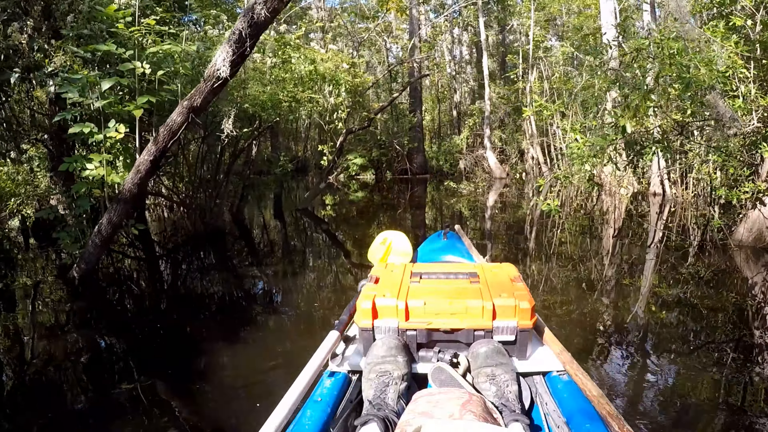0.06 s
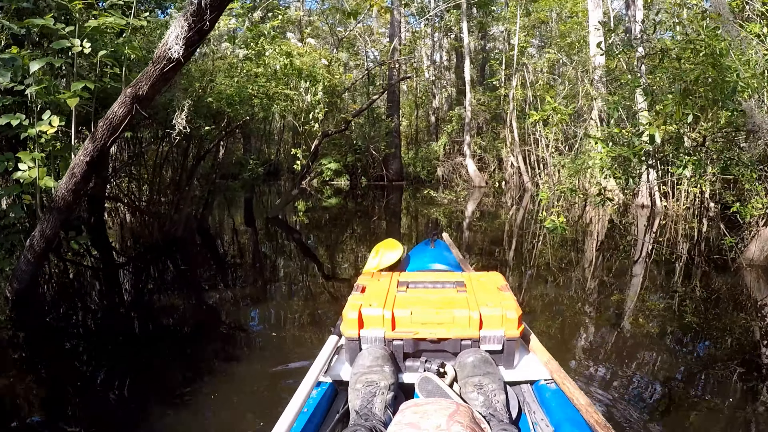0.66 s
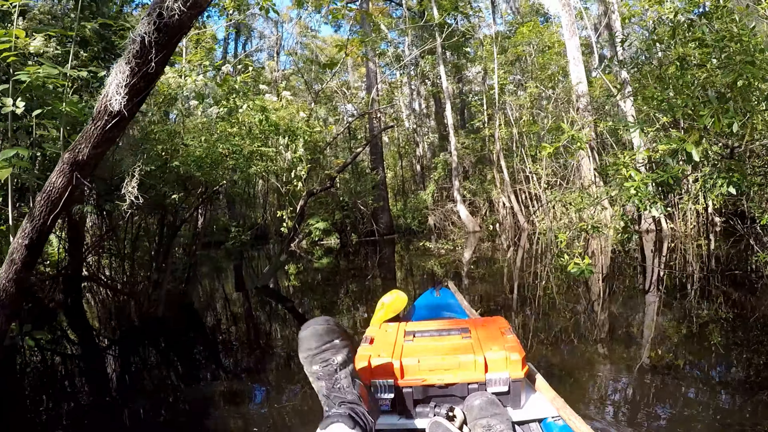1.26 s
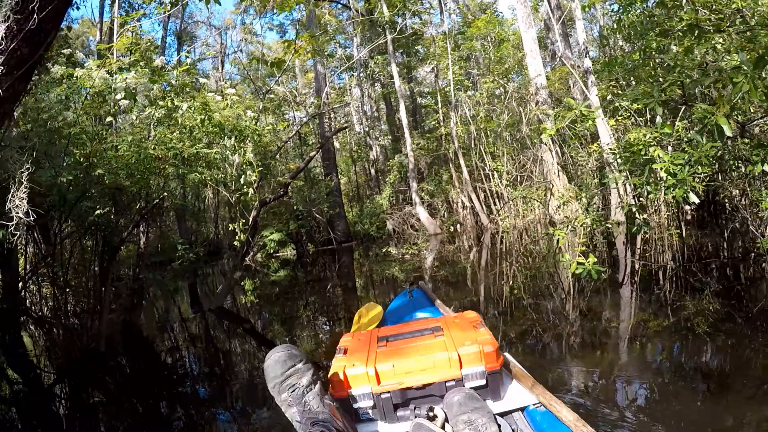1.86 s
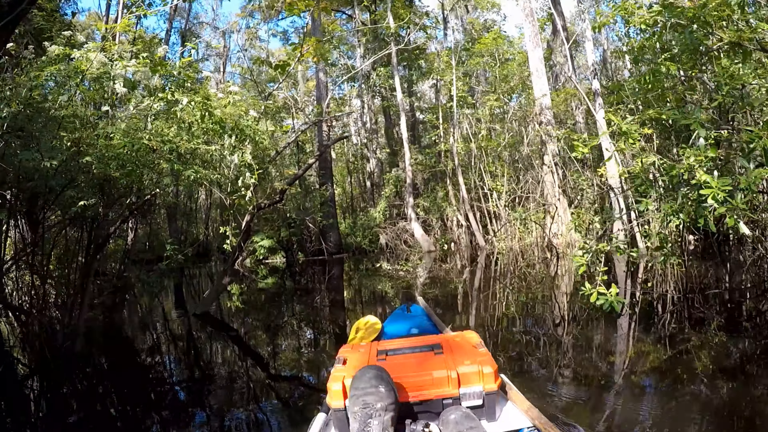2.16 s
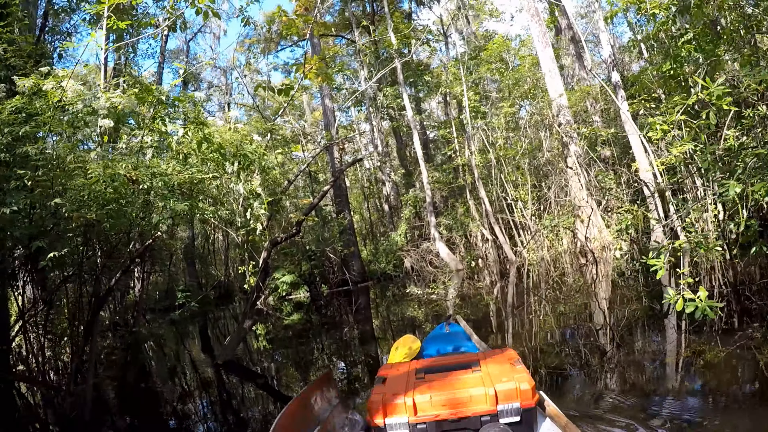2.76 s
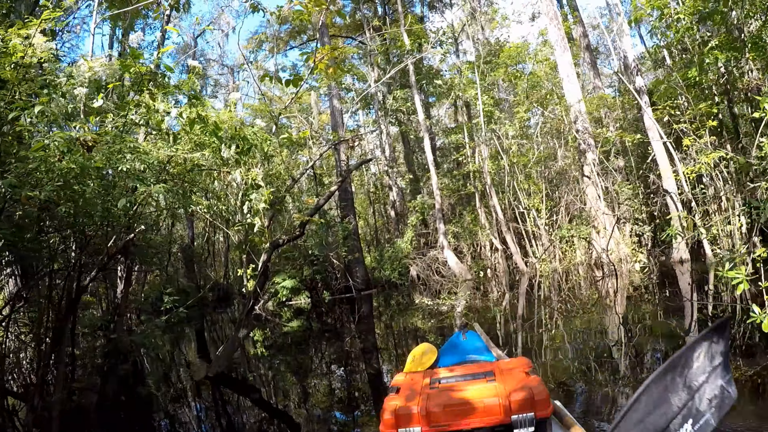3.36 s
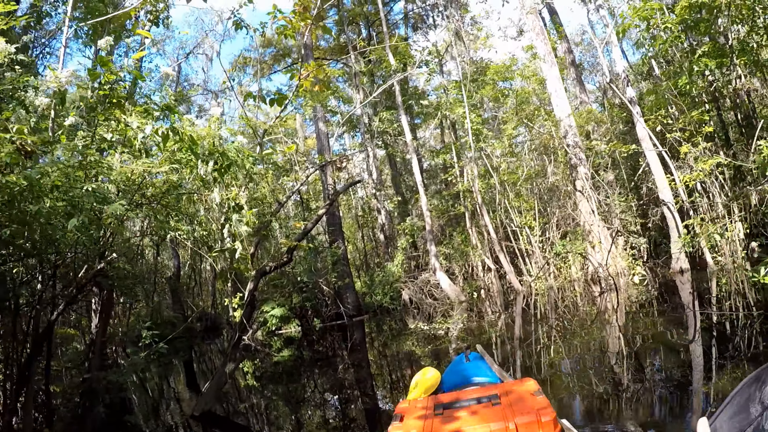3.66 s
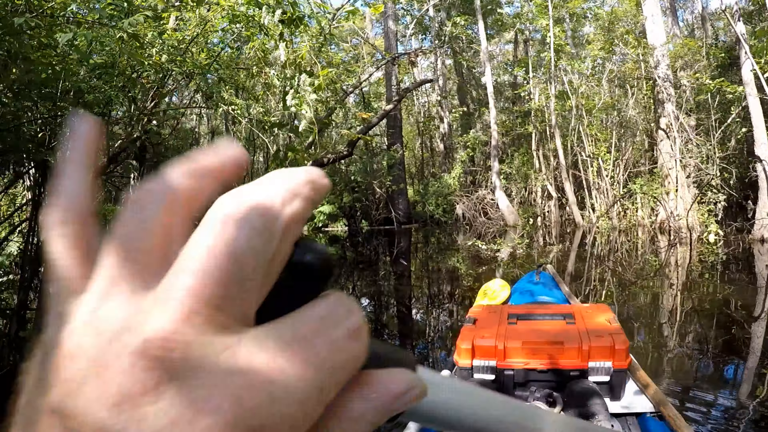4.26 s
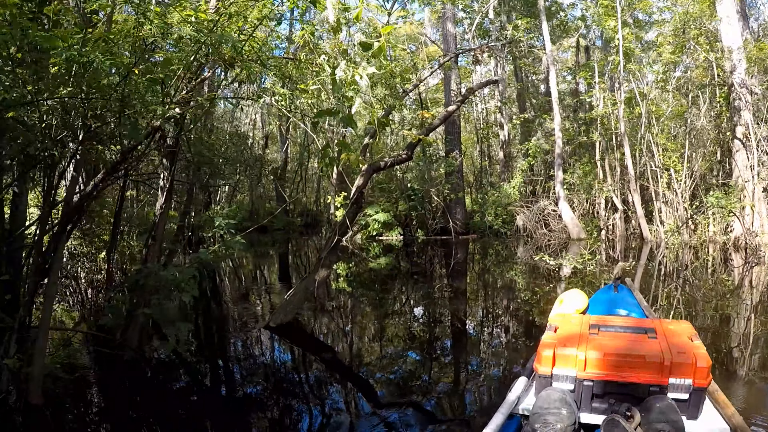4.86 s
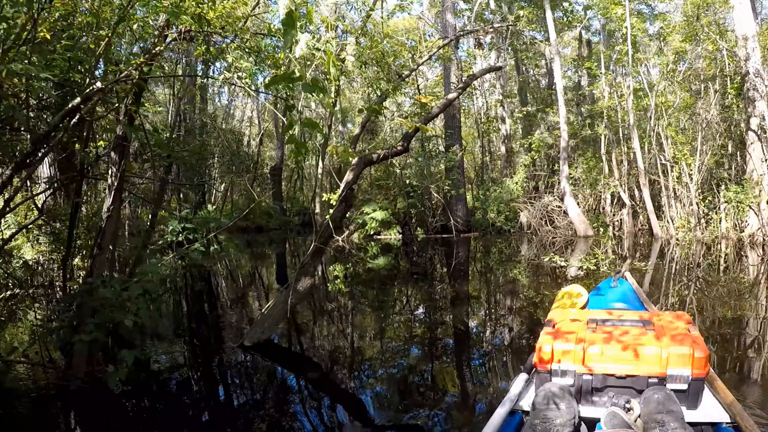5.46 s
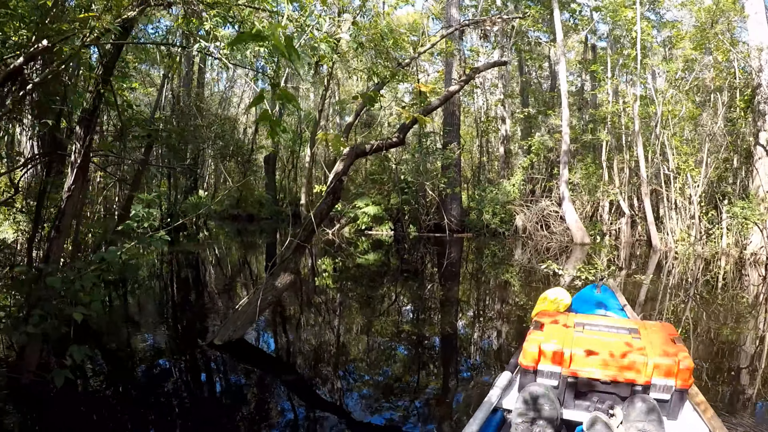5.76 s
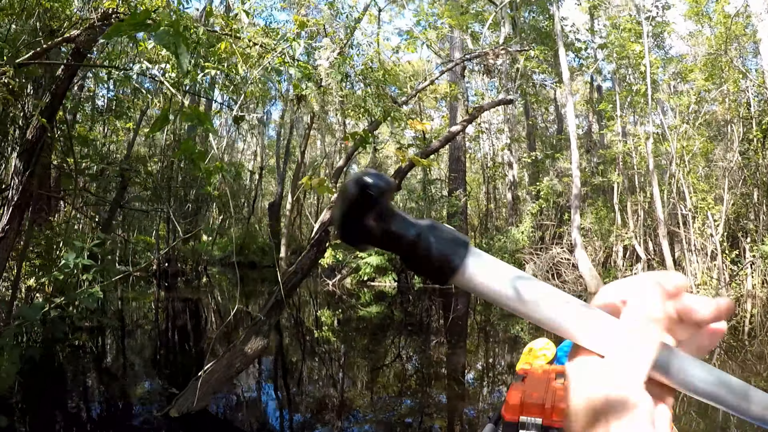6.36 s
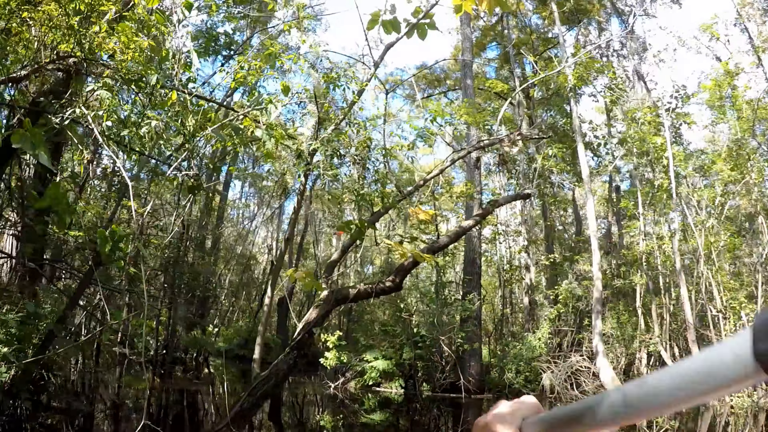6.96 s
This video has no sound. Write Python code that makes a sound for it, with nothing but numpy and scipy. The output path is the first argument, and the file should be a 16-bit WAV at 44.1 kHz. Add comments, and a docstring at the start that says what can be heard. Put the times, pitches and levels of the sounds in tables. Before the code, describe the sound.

Heard in stereo from the seat of a small plastic boat on a still swamp, a soft low hum and faint, thin insects run throughout. From the start, boots and hard gear knock and scrape close by on the hollow hull, building to a loud clatter and a short rubbing groan at 0.7 seconds. Another loud cluster of knocks comes at 1.6 seconds, with brief rubber squeaks. A low shudder swells underneath as weight shifts, and lighter bumps and scrapes continue until about 3 seconds.

Sleeves brush softly from 3.4 to 4.1 seconds, while a distant bird gives two very faint, high chirps. From about 5.2 seconds a paddle pulls once gently through the water on the right, with gurgling bubbles and drips, and a small flick of spray near 6.3 seconds. At about 6.7 seconds the shaft raps sharply on the boat's edge, ringing briefly through the hull.

```python
"""Boots and gear knock, scrape and squeak on the hollow hull of a small plastic boat, close to the
stereo microphone at the seat, and the boat shudders as the paddler's weight shifts. Sleeves brush; on
the right the blade pulls once through the water, stirring ringing bubbles, and drips. Last, the paddle
shaft raps the gunwale. Farther out on the still swamp: a low hum, a thin band of insects, a far bird."""
import sys
import numpy as np
from scipy import signal
from scipy.fft import rfft, irfft, next_fast_len
from scipy.io import wavfile
from scipy.ndimage import uniform_filter1d

SR = 44100
rng = np.random.default_rng(int(sys.argv[2]) if len(sys.argv) > 2 else 0)


def master_out(mix):
    """Clip the mix to full scale and print it as 16-bit PCM to the path in sys.argv[1]."""
    frames = np.transpose(np.atleast_2d(mix))
    ceiling = np.clip(frames, -1, 1)
    pcm = np.round(ceiling * 32767).astype(np.int16)
    wavfile.write(sys.argv[1], SR, pcm)


N = 309141
T = np.arange(N) / SR

# open air over the swamp: f/Hz, density/dB
AIR_SPECTRUM = [(90, -59), (125, -4), (205, -3.5), (235, -8), (300, -10), (420, -17.5), (650, -21.5),
                (1050, -24), (2200, -28.5), (3000, -30.5), (5500, -33.5), (7900, -29), (12000, -37),
                (14800, -50.5)]
# its stereo width: f/Hz, side against mid/dB
AIR_WIDTH = [(60, -10), (110, -8), (200, -3.5), (370, 3.5), (690, 10.5), (1260, 8.5), (2320, 2.5),
             (4270, -4), (7860, 3), (14500, -2.5)]
# a bird far off in the trees: t/s, length/s, f/Hz, level/dB
BIRD_CHIRPS = [(3.725, .06, 4900, -60), (4.02, 0.058, 4870, -62)]
# sleeves brushing as the paddle changes sides: t/s, rise/s, fall/s, level/dB
SLEEVE_BRUSHES = [(3.39, .03, 0.052, -56.5), (3.575, 0.17, 0.15, -52.5), (3.75, 0.14, 0.19, -59),
                  (3.935, 0.027, 0.045, -52.5), (4.05, .08, .08, -57), (6.3, 0.13, 0.35, -53)]
# brushing cloth: f/Hz, density/dB
CLOTH_SPECTRUM = [(900, -22), (1600, -3), (2200, 7.5), (2900, -4), (3800, 2), (5000, 0.5), (7800, 7.5),
                  (9500, -5), (13000, -19)]
# shifts of weight that rock the boat: t/s, rise/s, fall/s, level/dB
WEIGHT_SHIFTS = [(.68, 0.077, 1.4, -45), (1.08, 0.14, 0.53, -39.5), (1.7, 0.37, 0.9, -37.5),
                 (2.3, 0.24, .5, -47.5), (2.7, 0.46, 1.05, -48), (3.52, 0.14, 0.34, -55.5),
                 (3.98, 0.36, 0.56, -63)]
# shudder through the microphone mount: f/Hz, density/dB
RUMBLE_SPECTRUM = [(11, -20), (18, -3.5), (48, 1), (87, -8), (130, -1.5), (170, 10.5), (290, -120)]
# water churned by the blade: f/Hz, density/dB
CHURN_SPECTRUM = [(250, -6), (450, -10), (1000, -6.5), (1900, -1.5), (2500, -15), (3400, -9), (5000, -14.5),
                  (9000, -12)]
# spray flicked off the lifted blade: t/s, level/dB
SPRAY_FLICKS = [(6.085, -55), (6.175, -59), (6.265, -44)]
# single drops and bubbles beside the boat: t/s, f/Hz, level/dB, t60/s
WATER_DROPS = [(5.134, 3600, -49, .02), (5.212, 697, -40.5, 0.13), (5.290, 1360, -38, 0.015),
               (5.291, 1900, -32.5, 0.014), (5.327, 703, -41.5, 0.078), (5.338, 3500, -44.5, 0.017),
               (5.383, 1790, -34.5, 0.028), (5.402, 4100, -37, 0.011), (5.437, 3370, -44, 0.028),
               (5.467, 3300, -38, .014), (5.4956, 7840, -42, .01), (5.515, 1880, -23, 0.023),
               (5.522, 2730, -37, .012), (5.537, 760, -42, 0.033), (5.665, 1340, -37, .02),
               (5.680, 8700, -26.5, 0.006), (5.708, 990, -33, 0.022), (5.703, 8160, -28, 0.0049),
               (5.728, 8700, -31.5, 0.007), (5.831, 4400, -42.5, .012), (6.187, 8610, -33, 0.009),
               (6.229, 8920, -33, 0.0072), (6.2652, 8000, -18.5, 0.0027)]
# boots dragging on the hull; at 0.70 s a loud groan is cut off by a sudden drop in level:
# peak t/s, rise/s, fall/s, groan level/dB, rasp against groan/dB, hiss against groan/dB
BOOT_DRAGS = [(.24, 0.065, 0.57, -40.5, -6, -17.5), (0.668, 0.062, 0.095, -32, -4, -15),
              (0.698, 0.022, 0.0052, -18.5, -14, -30), (.79, 0.16, 0.28, -34.5, -5, -20.5),
              (1.05, 0.073, 0.41, -38, -5.5, -26), (1.567, 0.019, 0.046, -26.5, 0.5, -10),
              (1.589, 0.026, 0.12, -22, -5.5, -15), (1.681, 0.012, 0.046, -38, -8, -6.5),
              (1.75, 0.071, 0.55, -43.5, -15, -32), (2.253, 0.027, 0.089, -39, -7, -16),
              (2.37, 0.1, 0.25, -35, -10.5, -23.5), (2.392, 0.03, 0.033, -42, 3, -1.5),
              (2.63, 0.046, 0.65, -46.5, -7.5, -23)]
# a sole rubbing on plastic: f/Hz, density/dB
SOLE_SPECTRUM = [(130, 4), (260, 0), (450, -4.5), (700, -12.5), (880, -12), (1080, -8.5), (1600, -22),
                 (1900, -16.5), (2700, -19.5), (3800, -24.5), (4900, -29.5), (6000, -28), (9000, -36.5),
                 (12000, -65)]
# rubber squeaks in the hardest drag: t/s, length/s, f/Hz, slide/share of the pitch, level/dB
SOLE_SQUEAKS = [(1.566, 0.047, 3610, 0, -37), (1.602, 0.035, 6400, -0.015, -42),
                (1.612, 0.028, 1330, 0.038, -33), (1.618, 0.034, 5600, 0.024, -39),
                (1.596, 0.06, 3880, 0.126, -37.5), (1.667, 0.022, 6180, -0.123, -46),
                (1.69, 0.017, 3170, .12, -48)]
# loose hard gear, jolted: t/s, level/dB, left minus right/dB, crack against ring/dB
GEAR_JOLTS = [(.2098, -31.5, -2, -14), (.232, -42, -1, -17), (.277, -32, -5, -19), (.309, -37, -1, -20),
              (.424, -40, 0, -14), (.528, -37.5, 0, -21), (0.6558, -22.5, 0, -10), (.669, -31.5, -2, -7),
              (.686, -29.5, -4, -12), (.994, -41, -3, -14), (2.3897, -38, -5, 3.5), (2.3945, -43, 4, 4),
              (2.473, -47.5, -7, -8)]
# modes of that gear: f/Hz, level/dB, t60/s
GEAR_MODES = [(1677, -4, 0.052), (2108, 1, 0.032), (2310, 5.5, 0.016), (2560, -17.5, 0.021),
              (3260, -7, 0.038), (3660, -2, 0.016)]
# dense short ring of the boat's shell: f/Hz, density/dB
SHELL_SPECTRUM = [(120, 11.5), (250, 1), (600, 5.5), (1100, 0.5), (2000, -11.5), (2700, -13.5), (3600, -11),
                  (5000, -20.5), (8000, -13), (11000, -16), (15000, -98)]
# the shaft chatters on the gunwale: t/s, level/dB, contact cut-off f/Hz, left minus right/dB
SHAFT_RAPS = [(6.6534, -26.5, 3500, 2), (6.655, -24.5, 2600, -15), (6.6658, -18.5, 1090, 1.5),
              (6.676, -30.5, 800, -6), (6.684, -32, 1400, -6)]
# modes of shaft and gunwale: f/Hz, level/dB, t60/s
SHAFT_MODES = [(163.3, -11.5, 0.29), (195, -13, 0.12), (269, -8.5, 0.14), (323, -21, 0.065),
               (474, -19, 0.16), (580, -8.5, 0.09), (742, -0.5, 0.071), (845, -8, 0.051), (868, -8, 0.072),
               (1130, 5.5, 0.027), (1232, 1, 0.057), (1260, -1, 0.028), (1700, 4.5, 0.03), (1840, 4, 0.032),
               (2020, 3.5, 0.028), (2180, -28, 0.025), (2380, -35, .05), (3140, -29, 0.064),
               (3530, -3.5, 0.02), (3770, -30, 0.02)]
# boots and gear landing on the hull: t/s, level/dB, contact cut-off f/Hz, left minus right/dB,
# contact damping t60/s, thud f/Hz, clack f/Hz, tick f/Hz
HULL_BLOWS = [(0.03, -48.5, 1100, 17, 0.7, 447, 990, 3380), (0.15, -40.5, 1400, 1, 0.47, 400, 1020, 3800),
              (0.2099, -34.5, 5500, -1.5, 0.41, 440, 1520, 3600),
              (.231, -35, 2720, 0, 0.55, 410, 1110, 3280), (0.243, -44.5, 2600, 2, 0.49, 348, 1190, 3350),
              (.276, -30, 2020, 3.5, 0.49, 415, 1003, 3450), (0.308, -45, 3900, -7, 0.79, 427, 1720, 3200),
              (.424, -38.5, 1270, -2, 0.43, 315, 2040, 3600),
              (0.527, -39.5, 3420, -4.5, 0.4, 396, 1210, 3750),
              (0.639, -32, 1400, 3, 0.19, 437, 1150, 3300), (.655, -17, 2000, -2, 0.19, 390, 1366, 3500),
              (0.668, -17, 700, 6, 0.054, 383, 1410, 3680), (0.685, -22, 1140, 2, 0.053, 417, 1385, 4800),
              (.711, -32.5, 400, -2, 0.042, 310, 1100, 3500),
              (0.811, -32.5, 400, -3, 0.56, 354, 1090, 3500),
              (0.841, -32.5, 1610, 7, 0.33, 435, 1300, 3870), (0.948, -41, 2700, -4, 0.56, 437, 1430, 3720),
              (0.984, -41, 2480, -1, .5, 445, 1890, 3740), (.994, -33.5, 1250, 4, 0.45, 475, 1200, 3540),
              (1.061, -25, 810, 3, 0.3, 417, 1075, 3850), (1.225, -42.5, 800, -1, 0.33, 450, 900, 5900),
              (1.26, -46.5, 7100, -1, 0.12, 434, 1110, 3980), (1.3398, -36, 326, 1, 0.041, 470, 755, 3500),
              (1.557, -26.5, 1200, -5, 0.36, 437, 1310, 3480),
              (1.567, -24.5, 1900, 10, 0.34, 435, 1190, 4220),
              (1.584, -18.5, 1320, -3, 0.17, 367, 1470, 3700),
              (1.591, -20, 400, -4, 0.068, 384, 1100, 3700), (1.652, -32, 1010, -1, 0.57, 403, 1070, 3500),
              (2.3895, -31, 1050, -1, 0.08, 530, 1390, 3160), (2.401, -39, 820, -10, 0.09, 475, 1120, 3480),
              (2.452, -42, 500, -11, .08, 490, 1000, 3500), (2.51, -41.5, 950, -3, 0.66, 385, 1170, 5900),
              (2.603, -49, 1700, -5, 0.065, 437, 1800, 3500), (2.839, -30, 390, -5, 0.12, 520, 740, 3500),
              (2.847, -40.5, 228, 1, 0.31, 494, 800, 3500), (3.059, -43, 190, -3, 0.15, 305, 800, 3500)]
# modes of the hull: f/Hz, level/dB, t60/s
HULL_MODES = [(161, -1.5, 0.7), (194.5, -5.5, 1), (227.8, -3, 0.33), (271, 2, 0.14), (307.6, 0.5, 0.14),
              (402, -4, 0.059), (486, -6.5, 0.18), (585, -6.5, 0.12), (677, -3.5, 0.093), (770, -3, 0.056),
              (1090, -9.5, 0.047), (1200, -7, 0.018), (1376, -16, 0.021), (1510, -19, 0.024),
              (1804, -7, 0.026), (1917, -6.5, 0.048), (2070, -13, 0.031)]

MIC_LAG_S = 0.00025  # sound from the right reaches the left microphone this late
# one stroke: the blade slides in, pulls and leaves, then water runs off it
STROKE_S, STROKE_RISE_S, STROKE_HOLD_S, STROKE_FALL_S, RUNOFF_S = 5.52, 0.3, 0.31, 0.16, 0.55


def undb(db):
    """Decibels to gain."""
    return 10 ** (np.asarray(db) / 20)


def unit(x):
    """Scale to rms 1."""
    return x / np.sqrt(np.mean(x ** 2) + 1e-20)


def unit_head(x, seconds):
    """Scale so that the first moments have rms 1."""
    return x / np.sqrt(np.mean(x[:, :int(seconds * SR)] ** 2))


def noise(size=N):
    """Two unrelated channels of white noise."""
    return rng.standard_normal((2, size))


def band(x, lo_hz, hi_hz, order=3):
    """Butterworth band-pass."""
    sos = signal.butter(order, [lo_hz, min(hi_hz, SR / 2 - 1)], "band", fs=SR, output="sos")
    return signal.sosfilt(sos, x)


def colour(x, points):
    """Filter by (f/Hz, level/dB) points joined on a log axis."""
    hz, db = np.transpose(points)
    size = next_fast_len(x.shape[-1])
    f = np.fft.rfftfreq(size, 1 / SR) + 1
    gain = undb(np.interp(np.log(f), np.log(hz), db))
    return irfft(rfft(x, size) * gain, size)[..., :x.shape[-1]]


def walk(rate_hz):
    """Smooth random wander of rms 1."""
    hold = int(SR / rate_hz)
    steps = np.repeat(rng.standard_normal(N // hold + 1), hold)
    return unit(uniform_filter1d(uniform_filter1d(steps, hold), hold)[:N])


def fade(t, t60):
    """Exponential decay, 60 dB in t60."""
    return np.exp(-np.log(1000) * t / t60)


def swell(s, rise, fall, hold=0):
    """Attack, hold, release: full from s on; rise and fall are the times to a tenth."""
    return 10 ** -np.where(T < s, ((T - s) / rise) ** 2, np.maximum(T - s - hold, 0) / fall)


def swells(rows):
    """Joint gain of overlapping swells (t/s, rise/s, fall/s, level/dB)."""
    return np.sqrt(sum((undb(db) * swell(s, rise, fall)) ** 2 for s, rise, fall, db in rows))


def add(out, s, x):
    """Mix x into out at time s."""
    i = max(int(s * SR), 0)
    out[..., i:i + x.shape[-1]] += x[..., :max(out.shape[-1] - i, 0)]


def pan(x, db):
    """Left louder by db."""
    return x * undb(np.array([[db], [-db]]) / 2)


def spread(mid, side):
    """Panels all around the seat: bass alike at both microphones, treble wide."""
    side = colour(side, [(250, -26), (550, -11.5), (1000, 1.5), (3000, -5.5)])
    return np.array([mid + side, mid - side])


def from_right(x):
    """The left microphone hears it a moment late."""
    t = np.arange(len(x)) / SR
    return np.array([np.interp(t - MIC_LAG_S, t, x, left=0), x])


def ring(modes, t, detune, scatter_db):
    """Decaying modes; each blow lands elsewhere and scatters their tuning, weights and signs."""
    hz, db, t60 = np.transpose(modes)[:, :, None]
    shift, weight, polarity = rng.standard_normal((3, len(modes), 1))
    gain = np.sign(polarity) * undb(db + scatter_db * weight)
    return (gain * fade(t, t60) * np.sin(2 * np.pi * hz * (1 + detune * shift) * t)).sum(0)


def note(hz, t, t60):
    """One damped resonance, reaching each microphone with its own phase."""
    onset = 1 - np.exp(-t * hz)
    return np.sqrt(2) * onset * fade(t, t60) * np.sin(2 * np.pi * (hz * t + rng.random((2, 1))))


def swamp_air():
    """Soft air with a low hum, all around the boat."""
    mid, side = colour(noise(), AIR_SPECTRUM)
    side = colour(side, AIR_WIDTH)
    return np.array([mid + side, mid - side]) / np.std(mid) * undb(-50 + 0.07 * walk(3.76))


def wing_buzz(hz, width_hz):
    """Wings buzz in one narrow band, flickering slightly."""
    flicker = undb(walk(40))
    return unit(band(noise(), hz - width_hz / 2, hz + width_hz / 2, order=2)) * flicker


def insects():
    """A steady chorus far out on the swamp; one nearer insect trills briefly."""
    chorus = undb(-66) * wing_buzz(hz=7690, width_hz=480)
    trill = undb(-62.5) * wing_buzz(hz=6300, width_hz=390)
    return chorus + trill * swell(2.23, rise=0.19, fall=0.4, hold=0.35)


def bird():
    """Brief thin whistles from far off in the trees."""
    out = np.zeros((2, N))
    for s, length, hz, db in BIRD_CHIRPS:
        size = int(length * SR)
        phase = 2 * np.pi * np.cumsum(hz * (1 + 0.012 * walk(300)[:size])) / SR
        add(out, s, undb(db) * np.hanning(size) * np.sin(phase))
    return out


def sleeves():
    """Cloth brushes near the microphone in soft uneven strokes."""
    return unit(colour(noise(), CLOTH_SPECTRUM)) * undb(1.4 * walk(60)) * swells(SLEEVE_BRUSHES)


def rocking(rest_db=-71.5):
    """Each shift of weight sends a slow-dying shudder up the microphone mount; at rest it trembles."""
    mid, side = band(colour(noise(), RUMBLE_SPECTRUM), 16.5, 92)
    shudder = unit(np.array([mid + side / 4, mid - side / 4]))
    return shudder * np.hypot(swells(WEIGHT_SHIFTS), undb(rest_db))


def bubble(hz, t60, glide):
    """Trapped air rings and rises in pitch, heard directly and reflected off the boat's side."""
    t = T[:int(t60 * SR) + 2]
    phase = 2 * np.pi * hz * t * (1 + glide * t / t60 / 2)
    left_lag = 2 * np.pi * hz * MIC_LAG_S * np.array([[1], [0]])
    reflection = undb(-6.5) * np.sin(phase + 2 * np.pi * rng.random((2, 1)))
    onset = 1 - np.exp(-t * hz / 0.1)
    return onset * fade(t, t60) * (np.sin(phase - left_lag) + reflection)


def froth(lo_hz, hi_hz, cycles, scatter_db, count):
    """A cloud of bubbles, many faint and a few loud, over the span of the stroke."""
    out = np.zeros((2, N))
    start, end = STROKE_S - STROKE_RISE_S, STROKE_S + STROKE_HOLD_S + RUNOFF_S + STROKE_FALL_S
    for when, pitch, faintness, life in rng.random((count, 4)):
        hz = lo_hz * (hi_hz / lo_hz) ** pitch
        gain = undb(-scatter_db * np.log(faintness + 1 / 20)) * np.sqrt(hz)
        t60 = cycles * (0.5 + life) / hz
        add(out, start + when * (end - start), gain * bubble(hz, t60, glide=0.11))
    return unit(out) * np.sqrt((end - start) / (N / SR))  # rms 1 within the stroke


def drop(hz, t60):
    """A drop rings one bubble inside a brief splat."""
    t = T[:SR // 10]
    splat = band(noise(len(t)), hz / 1.4, hz * 1.44, order=2) * fade(t, t60=0.067)
    out = undb(-20) * unit_head(splat, 0.0033)
    add(out, 0, bubble(hz, t60, glide=0.066))
    return out


def paddle_stroke():
    """Just off the right side the blade churns the water, stirs bubbles, throws spray and drips."""
    pull = swell(STROKE_S, STROKE_RISE_S, STROKE_FALL_S, STROKE_HOLD_S)
    runoff = undb(-9.5) * swell(STROKE_S + STROKE_HOLD_S, STROKE_RISE_S, STROKE_FALL_S, RUNOFF_S)
    flow = np.maximum(pull, runoff)
    flicks = swells((s, 0.039, 0.048, db) for s, db in SPRAY_FLICKS)
    gurgle = froth(380, 2200, cycles=19, scatter_db=3.5, count=520) * undb(-51.5) * flow
    plinks = froth(2680, 4000, cycles=32, scatter_db=3.2, count=300) * undb(-58.5) * flow
    spray = froth(5600, 10600, cycles=25, scatter_db=3, count=800) * (undb(-55) * flow + flicks)
    churn = unit(colour(noise(), CHURN_SPECTRUM)) * undb(-48.5 + 2 * walk(90)) * flow
    water = gurgle + plinks + spray + churn
    for s, hz, db, t60 in WATER_DROPS:
        add(water, s, undb(db) * drop(hz, t60))
    return pan(band(water, 310, 9760, order=5), -7.5)


def boot_drags():
    """Soles stick and slip: the hull groans, rasps and hisses. At 0.70 s the level drops suddenly."""
    slips = (rng.random((2, N)) < 6000 / SR) * noise() * undb(2.04 * walk(110))  # 6000 a second
    rub = colour(spread(*slips), SOLE_SPECTRUM)
    groan = unit(band(rub, 81, 823))
    rasp = unit(band(rub, 710, 2110))
    hiss = unit(band(rub, 3240, 11000, order=4))
    groan_gain = swells(row[:4] for row in BOOT_DRAGS)
    rasp_gain = swells((s, rise, fall, db + rasp_db) for s, rise, fall, db, rasp_db, _ in BOOT_DRAGS)
    hiss_gain = swells((s, rise, fall, db + hiss_db) for s, rise, fall, db, _, hiss_db in BOOT_DRAGS)
    return groan * groan_gain + rasp * rasp_gain + hiss * hiss_gain


def boot_squeaks():
    """For moments the rubber slips almost regularly and sings a hoarse, sliding note."""
    out = np.zeros((2, N))
    for s, length, hz, slide, db in SOLE_SQUEAKS:
        size = int(length * SR)
        jitter = 0.035 * walk(1500)[:size]
        phase = 2 * np.pi * np.cumsum(hz * (1 + np.linspace(0, slide, size) + jitter)) / SR
        grip = np.hanning(size) * undb(2.1 * walk(510)[:size])
        add(out, s, undb(db) * grip * np.sin(phase + rng.uniform(-0.98, 1, (2, 1))))
    return out


def gear_clacks():
    """Hard gear in the boat rings briefly in a few woody notes; a direct hit adds a sharp crack."""
    out, t = np.zeros((2, N)), T[:SR // 8]
    for s, db, pan_db, crack_db in GEAR_JOLTS:
        notes = np.array([ring(GEAR_MODES, t, detune=0.014, scatter_db=-0.5) for _ in range(2)])
        crack = band(noise(len(t)), 900, 6000) * fade(t, t60=0.013)
        clack = unit_head(notes, 0.0025) + undb(crack_db) * unit_head(crack, 0.002)
        add(out, s, undb(db) * pan(clack, pan_db))
    return out


def shell(t, t60, tail_db, tail_t60):
    """Crack of countless damped panel modes, with a faint tail from the trees."""
    panels = unit(colour(spread(*noise(len(t))), SHELL_SPECTRUM))
    return panels * (fade(t, t60) + undb(tail_db) * fade(t, tail_t60))


def paddle_raps():
    """The shaft rebounds on the gunwale by the seat; soft contacts lose treble, and the hull hums."""
    out, t = np.zeros((2, N)), T[:SR // 2]
    for s, db, cutoff_hz, pan_db in SHAFT_RAPS:
        shaft = from_right(ring(SHAFT_MODES, t, detune=0.0041, scatter_db=-1))
        blow = shaft + undb(2.5) * shell(t, t60=0.048, tail_db=-19.5, tail_t60=0.59)
        crack = band(noise(len(t)), 4900, 6900, order=2) * fade(t, t60=0.28)
        hum = unit_head(band(blow, 166, 490), 0.036)
        hard_clack = band(blow, 580, 7800, order=2) + undb(-10.5) * crack
        softening = signal.butter(1, cutoff_hz, fs=SR, output="sos")
        clack = unit_head(signal.sosfilt(softening, hard_clack), 0.0073)
        add(out, s, undb(db) * (pan(clack, pan_db) + undb(-10) * pan(hum, -0.23)))
    return out


def contact(hz, cutoff_hz):
    """A soft contact pushes for longer and barely excites what lies above its cut-off."""
    return 1 / np.hypot(1, (hz / cutoff_hz) ** 2)


def knock(db, cutoff_hz, pan_db, damping_t60, thud_hz, clack_hz, tick_hz):
    """One blow sets off the hollow's boom, the panels' thud and clack, and a tick at the contact."""
    t = T[:SR // 3]
    mid = ring(HULL_MODES, t, detune=0.021, scatter_db=0.5)
    side = ring(HULL_MODES, t, detune=0.016, scatter_db=-0.5) * rng.choice([-1, 1])
    crack = undb(4) * shell(t, t60=0.014, tail_db=-10, tail_t60=0.18)
    blow = (spread(mid, undb(-3) * side) + crack) * fade(t, damping_t60)
    # a foot that stays on the hull shortens its free 0.61 s ring and stifles the boom
    boom_db = 3.5 + 6 * np.log2(damping_t60 / 0.61)
    boom = undb(boom_db) * unit_head(band(blow, 186, 284, order=2), 0.035)
    thud = unit_head(band(blow, thud_hz / 1.46, thud_hz * 1.195, order=2), 0.0077)
    panel = unit_head(band(blow, clack_hz / 1.47, clack_hz * 1.52), 0.0072)
    panel_note = undb(2.5) * note(clack_hz, t, t60=0.043)
    clack = undb(-1.5) * contact(clack_hz, cutoff_hz) * (panel + panel_note)
    snap = band(shell(t, t60=0.017, tail_db=-9.5, tail_t60=0.19), 3000, 9400, order=2)
    tip = unit_head(band(snap, tick_hz / 1.23, tick_hz * 1.23, order=1), 0.0053)
    striker_note = undb(-3) * note(tick_hz, t, t60=0.041)
    tick = undb(-2.5) * contact(tick_hz, cutoff_hz) * (tip + striker_note)
    # only the short waves are shadowed at the far microphone
    return undb(db) * (boom + thud + pan(clack + tick, pan_db))


def hull_knocks():
    """Boots and gear land on the hull close around the microphone, each on its own spot."""
    out = np.zeros((2, N))
    for s, *blow in HULL_BLOWS:
        add(out, s, knock(*blow))
    return out


def scene():
    """From the seat: the airborne sound has no deep bass; only the shaking mount carries it."""
    boat = hull_knocks() + gear_clacks() + paddle_raps() + boot_drags() + boot_squeaks()
    airborne = boat + paddle_stroke() + sleeves() + swamp_air() + insects() + bird()
    low_cut = signal.ellip(7, 0.3, 50, 127, "high", fs=SR, output="sos")
    return signal.sosfilt(low_cut, airborne) + rocking()


def record(dry):
    """The recorder cuts the top steeply above 14.4 kHz."""
    return signal.sosfilt(signal.ellip(8, 0.2, 70, 14400, fs=SR, output="sos"), dry)


dry = scene()
out = record(dry)
master_out(out)
```